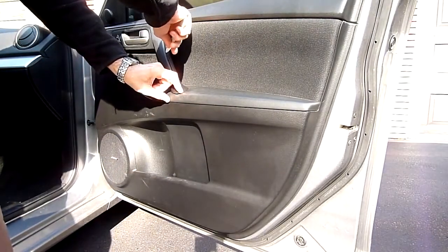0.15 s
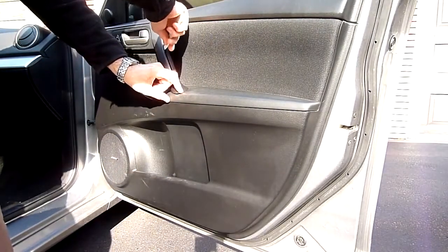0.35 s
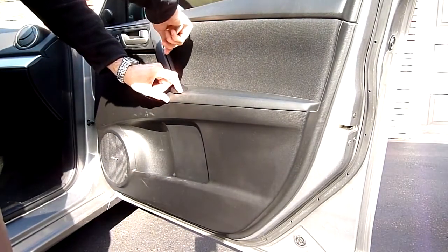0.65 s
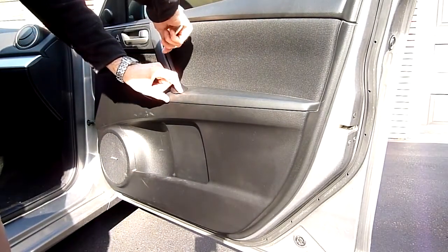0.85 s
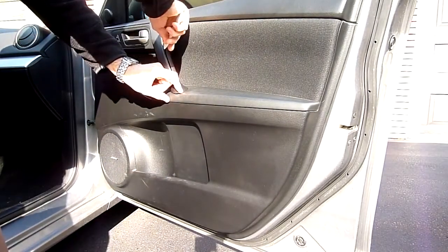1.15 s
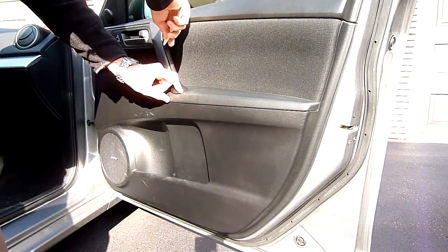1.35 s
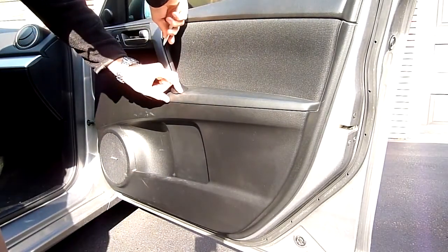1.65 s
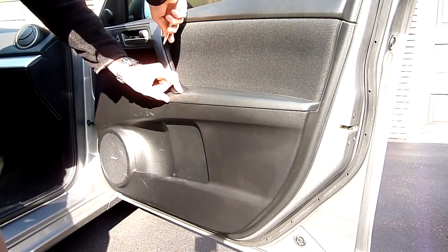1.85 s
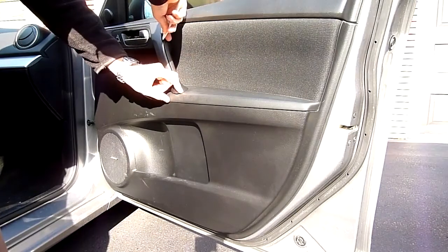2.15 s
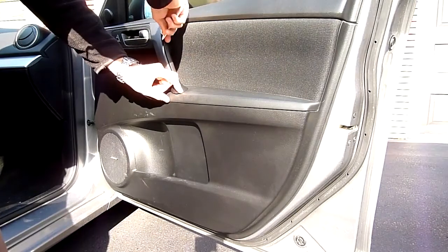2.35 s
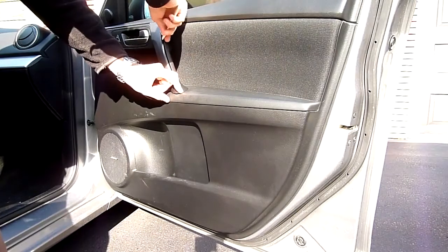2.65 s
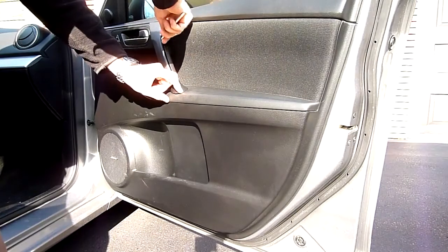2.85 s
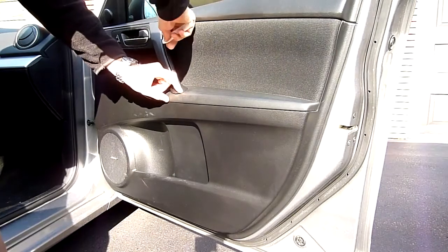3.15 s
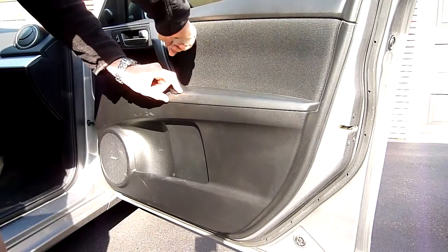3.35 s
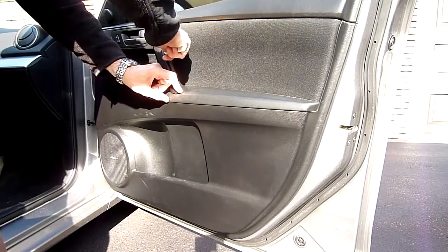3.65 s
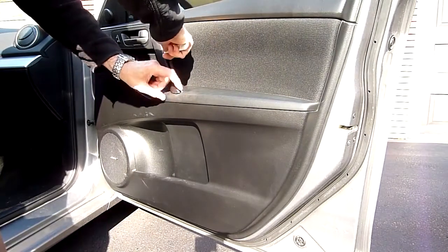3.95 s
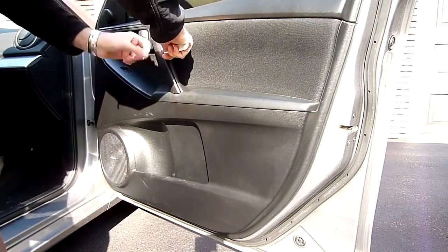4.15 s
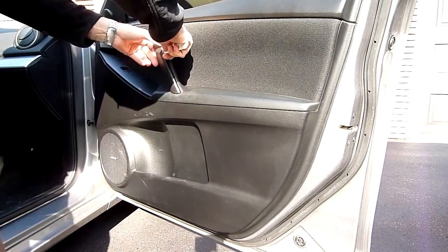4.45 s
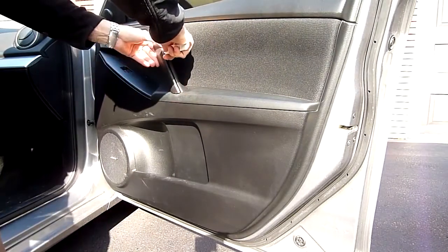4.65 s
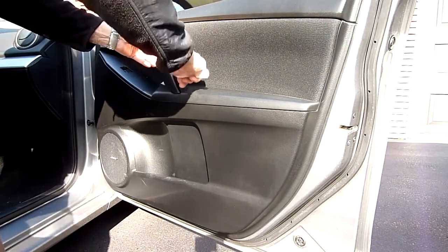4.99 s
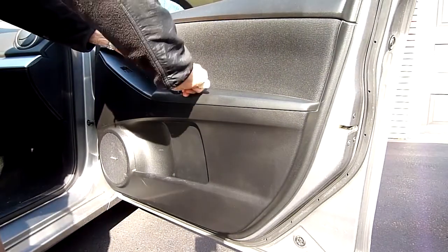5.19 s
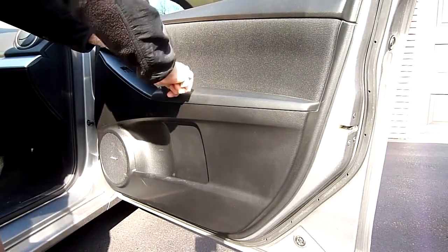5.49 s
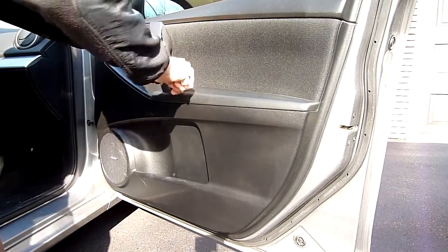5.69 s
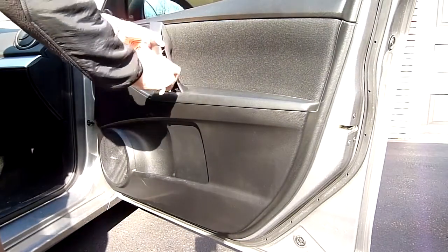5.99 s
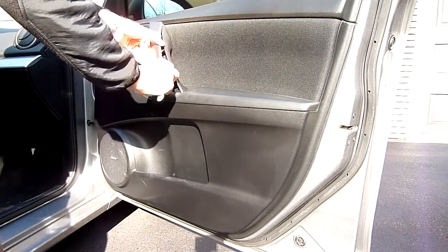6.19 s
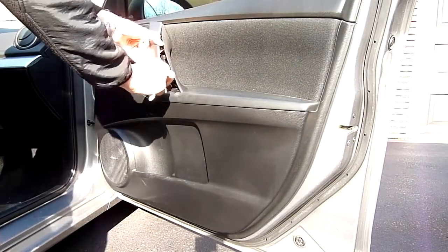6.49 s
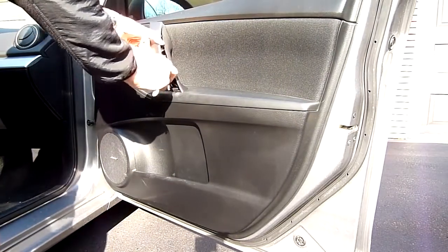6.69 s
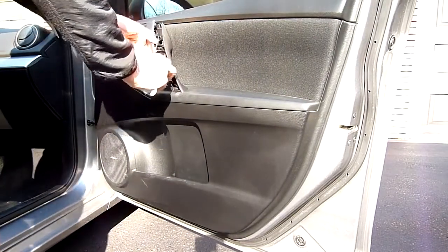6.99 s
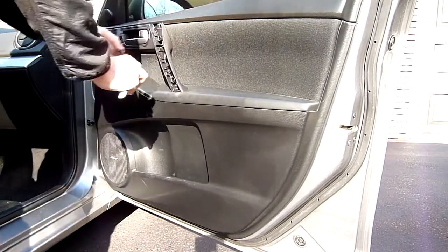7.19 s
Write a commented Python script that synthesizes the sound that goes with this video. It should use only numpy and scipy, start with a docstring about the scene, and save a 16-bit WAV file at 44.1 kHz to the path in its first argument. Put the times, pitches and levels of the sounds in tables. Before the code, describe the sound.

A tool ticks, knocks and scrapes against a plastic car door panel, then the trim cover pops off with loud snaps.

```python
"""Ticks, scrapes and hollow knocks, then loud snaps: a plastic trim cover is levered off an open car door.
The pry tool sticks, squeaks and slips in the seam until the clips let go. Each contact rings the
panel's modes, its plastic and the cabin behind it, heard as a thump, a knock and a crack.
A jacket sleeve rustles now and then over a steady outdoor rush; a faint whine joins late."""
import sys
import numpy as np
from scipy import signal
from scipy.fft import irfft
from scipy.io import wavfile

SR = 44100
rng = np.random.default_rng(int(sys.argv[2]) if len(sys.argv) > 2 else 0)


def unload_wav(signal):
    """Save mono or channel-first audio to the path in sys.argv[1] as 16-bit WAV at rate SR, clipped to [-1, 1]."""
    wavfile.write(
        sys.argv[1],
        SR,
        np.round(np.clip(np.atleast_2d(signal).T, -1, 1) * 32767).astype(np.int16),
    )


N = 323253
RING_SIZE = 12000   # samples of ring after a contact
AGE = np.arange(RING_SIZE) / SR
EDGES = np.geomspace(22, 18000, 21)   # half-octave bands [Hz]
CENTRES = np.sqrt(EDGES[1:] * EDGES[:-1])
LEFT_RIGHT = np.array([[1], [-1]])
THUMP_HZ, KNOCK_HZ, CRACK_HZ, GRIT_HZ = 326, 918, 3350, 4537   # panel, cover, edge, plastic grain


def snaps(spots, punch_db=4.0, punch_s=0.0048):
    """The clips spring free; the hand damps the cover, so the first instant stands out."""
    # clips letting go: (time [s], thump [dB], thump [Hz], knock [dB], knock [Hz], crack [dB],
    # crack [Hz], crack span [frequency ratio each way])
    releases = [(5.4058, 31, 377, 28, 1020, 2, 6400, 3.6), (5.479, 28, 270, 15, 1260, 1.5, 4900, 1.7),
                (5.4841, 2, 260.2, 22.5, 606, 15.5, 3340, 1.17),
                (6.763, -5, 277, 19.5, 1210, 12, 6000, 1.22),
                (6.7672, 29.5, 420, 26.5, 1700, 16.5, 5670, 1.41)]
    out = np.zeros((2, N))
    grip = 1 + (from_db(punch_db) - 1) * np.exp(-(AGE / punch_s) ** 2)
    for (s, *colour, span), spot in zip(releases, spots):
        add(out, s, contact(spot * grip, *colour, spans=(1.48, 1.496, span), flex_db=-9, fizz_db=-17))
    return out


def pries(spots, groan_hz=383):
    """The tool drags and squeaks along the seam under rising force, then slips and hits the panel."""
    # (slip time [s], drag length [s], groan [dB], grit [dB], squeak [Hz], thump [dB], knock [dB])
    strokes = [(0.27, .033, -16.5, -37, 3160, 15.5, -2), (3.422, 0.017967, -19.5, -23.5, 9350, 5, 20.5),
               (3.438, .014, -13.5, -22, 5800, 23, 19), (4.9, 0.022, -27, -30.5, 9930, 19.5, -8),
               (4.9365, 0.029, -25, -32.5, 5700, 13.5, 22), (5.031, 0.018, -28, -31, 9800, 15, 19),
               (5.089, .027, -35, -30, 4540, 17, 18)]
    out = np.zeros((2, N))
    for (s, length, groan_db, grit_db, squeak_hz, thump_db, knock_db), spot in zip(strokes, spots):
        grit_hz = GRIT_HZ * (squeak_hz / GRIT_HZ) ** 0.49   # the grit brightens with the squeak
        colour = groan_db, groan_hz, groan_db - 3, KNOCK_HZ, grit_db, grit_hz
        add(out, s - length, scrape(spot, length, *colour, slips_per_s=1200))
        add(out, s - length, squeak(length, squeak_hz, grit_db - 10, roughness=0.24))
        add(out, s, contact(spot, thump_db, THUMP_HZ, knock_db, knock_hz=642,
                            crack_db=-7, crack_hz=CRACK_HZ, flex_db=-10))
    return out


def taps(spots, faint_per_s=1.5, spread_db=2.5):
    """The tool ticks and knocks on the panel; never quite still, it adds faint ticks at random."""
    # (time [s], thump [dB], knock [dB], knock [Hz], crack [dB])
    hits = [(0.079, 6, -2, 520, -37), (0.229, 7, 4, 784, -16), (0.246, 15, 9, 760, -10.5),
            (0.302, 1, -1, 704.8, -17), (0.482, 3, 7, 865, -30), (0.874, -14, 3, 704, -18),
            (0.998, -9, 1.5, 800, -32), (1.216, -4, 1, 780, -16), (1.235, 10.5, 17.5, 870, -28.5),
            (1.282, 2, 10.5, 546, -18), (1.85, -5, 0, 980, -21), (1.968, 5, 5, 1040, -24),
            (2.0, 4, 14, 470, -14), (2.082, -4, 1.5, 785, -29), (2.117, 4.5, -19, 550, -34),
            (2.193, 5, -12, 800, -25), (2.367, -4, 8, 845, -21), (2.408, 2, 5, 810, -35),
            (2.658, -8, -8, 1118, -26), (2.715, 2, 7, 457, -13), (2.84, -3, 8, 810, -23.5),
            (3.241, 0, -5, 960, -38.5), (3.408, 8.5, -1, 950, -9), (3.511, 12.5, 7, 440, -22),
            (3.6507, 4.5, 7, 920, -21), (3.999, 0, 0.5, 715.5, -13), (4.411, -13, -5, 1320, -24),
            (4.461, 2, 5, 540, -35), (4.7267, 5, 2, 853.1, -11.5), (4.768, 8, 10.5, 750, -11),
            (5.282, -3, 4, 991.4, -13), (5.576, 4, -11, 1600, -20.5), (5.607, 1, -27, 1600, -10),
            (6.912, 6.5, -11, 1600, -22)]
    out, chance = np.zeros((2, N)), rng.random((40, 2))
    times = np.cumsum(-np.log(1 - chance[:, 0])) / faint_per_s
    accents_db = spread_db * (2 * chance[:, 1] - 1)
    faint = [(s, db - 8, db - 4.5, KNOCK_HZ, db - 28) for s, db in zip(times, accents_db) if s < N / SR]
    for (s, thump_db, knock_db, knock_hz, crack_db), spot in zip(hits + faint, spots):
        add(out, s, contact(spot, thump_db, THUMP_HZ, knock_db, knock_hz, crack_db, CRACK_HZ))
    return out


def rubs(spots, cover_hz=1188):
    """Dull, short scrapes: the loosened cover sliding on the door, the panel juddering just after a slip, and
    soft, slow knocks."""
    # (time [s], length [s], body [dB], body [Hz], hiss [dB])
    shifts = [(0.825, 0.069, -29.5, 517, -55), (1.286, 0.014, -22, 450, -48),
              (1.991, 0.052, -26, 424.2, -43), (2.705, 0.015, -19, 410, -61), (3.116, 0.043, -20, 515, -41),
              (3.505, 0.049, -26, 430, -57), (4.769, 0.11, -24.5, 337, -58.5),
              (4.951, 0.067, -26, 620, -45.5), (5.1, .06, -22.5, 534.8, -42),
              (5.205, 0.11937, -23.5, 313, -50), (5.404, 0.0056, -10, 600, -24),
              (5.477, .012, -3, 290, -22), (5.746, .05, -22.5, 314.3, -56), (6.11, .06, -27.5, 380, -54),
              (6.608, 0.02, -12.5, 281, -52.5)]
    out = np.zeros((2, N))
    for (s, length, body_db, body_hz, hiss_db), spot in zip(shifts, spots):
        add(out, s, scrape(spot, length, body_db, body_hz, body_db - 26, cover_hz, hiss_db, GRIT_HZ))
    return out


def squeaks():
    """Thin squeaks as the tool feels along the seam under light pressure."""
    # (time [s], length [s], pitch [Hz], level [dB])
    slides = [(0.824, 0.13, 3640, -56), (1.208, 0.02512, 5000, -51), (1.259, 0.036, 2980, -56.5),
              (1.28, .16, 5100, -62), (1.35, .1, 3100, -59), (4.76, 0.21, 5977, -55)]
    out = np.zeros((2, N))
    for s, length, hz, level_db in slides:
        add(out, s, squeak(length, hz, level_db, roughness=0.055))
    return out


def door_responses(count, click_db=-6, bending_db=-7, plastic_db=-0.5, modes_db=1, spread_db=1.5):
    """The door's answer to a tap at count spots: click, bending wave, modes, dense ring and cabin."""
    # modes of the panel and its cover: (frequency [Hz], relative level [dB], t60 [s])
    panel_modes = [(163, -21, 0.17), (234, 2.5, 0.12), (270, 5, 0.25), (340, -28.5, 0.16),
                   (406.3, 0, 0.067), (487, 5.5, 0.068), (555, 5, 0.31), (662.4, 4, 0.10056),
                   (930.52, 5.5, 0.044), (989.92, 6, 0.063), (1418, 5, 0.03), (1600, -3, 0.0592),
                   (1980, 6.5, 0.019), (2285, -27, 0.088), (3180, -10.5, 0.015), (3580, -9, 0.0562),
                   (3930, -29, 0.069), (4840, -10, 0.054), (5376.9, -5, 0.016), (5490, 2, 0.036),
                   (5900, 3.5, 0.025), (6680, -2, 0.04), (7460, -16, 0.039), (9800, 7, .025),
                   (10460, 8, 0.04)]
    # dense ring: (frequency [Hz], plastic t60 [s], cabin t60 [s], cabin level [dB])
    tails = [(152, 0.15, 0.6, -1), (430, 0.18, 0.41, -13), (1010.3, 0.056, 0.21, -10.5),
             (2476, 0.015, 0.061, 1.5), (6000, 0.028, 0.1, -9.5), (14000, 0.0064, 0.0747, -12)]
    hz, level_db, t60 = np.transpose(panel_modes)
    damping = np.log(1000) / (t60[:, None] * SR)
    modes = 2 * damping * np.exp(-damping * AGE * SR) * np.cos(2 * np.pi * hz[:, None] * AGE)
    plastic = from_db(plastic_db) * decays(at_hz(tails, CENTRES))
    cabin = from_db(at_hz(tails, CENTRES, column=3))[:, None] * decays(at_hz(tails, CENTRES, column=2))
    decay = np.hypot(plastic, cabin)
    # stereo width of the ring: (frequency [Hz], side against mid [dB])
    side_levels = [(200, -31.5), (600, -20), (1400, -12), (5000, -14), (13000, -10)]
    width = from_db(at_hz(side_levels, CENTRES))
    noise = noise_bands()
    attack = from_db(click_db) * (AGE == 0) + from_db(bending_db) * bending_wave()
    for start in rng.integers(0, N - RING_SIZE, count):
        mid, side = (noise[:, :, start:start + RING_SIZE] * decay[:, None]).transpose(1, 0, 2)
        # every spot drives the modes with strengths of its own
        ringing = from_db(modes_db + level_db - spread_db * rng.standard_normal(len(hz))) @ modes
        yield attack + ringing + mid.sum(0) + 2 * (width @ side) * LEFT_RIGHT


def bending_wave(travel_s=0.003098, damping_hz=1400):
    """Low bending waves cross the panel more slowly, so a tap falls in pitch; travel_s is at 1 kHz."""
    hz = np.arange(RING_SIZE // 2 + 1) * SR / RING_SIZE
    phase = 4 * np.pi * travel_s * np.sqrt(1000 * hz)
    return irfft(np.exp(-1j * phase) / (1 + 1j * hz / damping_hz) ** 2, RING_SIZE)


def contact(shake, thump_db, thump_hz, knock_db, knock_hz, crack_db, crack_hz,
            spans=(1.52, 1.391, 1.944), flex_db=-14, fizz_db=-23.5, energy=1.0):
    """The panel thumps, the cover knocks and the edge cracks, each higher for a stiffer contact."""
    thump_span, knock_span, crack_span = spans   # frequency ratios each way
    layers = [(thump_db + flex_db, 130, 1.4),   # the whole door flexes under the thump
              (thump_db, thump_hz, thump_span),
              (knock_db, knock_hz, knock_span),
              (crack_db, crack_hz, crack_span),
              (crack_db + fizz_db + 20 * np.log10(crack_hz / 5000), 13000, 1.3)]   # the crack's top fizz
    out = 0
    for k, (level_db, hz, span) in enumerate(layers):
        low, high = hz / span, hz * span
        layer = band(shake, low, high)
        share = energy * 2 * (high - low) / SR   # the band's share of the energy
        out = out + (-1) ** k * from_db(level_db) * layer * np.sqrt(2 * share / np.sum(layer ** 2))
    return out


def scrape(response, length, *colour, slips_per_s=1800, spread_db=4.0, build=0.2):
    """Stick and slip over grained plastic: a dense run of tiny uneven taps that builds with the force."""
    size = int(length * SR)
    slipping = rng.random(RING_SIZE) < slips_per_s / SR
    strength = from_db(spread_db * np.minimum(rng.exponential(1, RING_SIZE), 4))
    slips = slipping * strength * rng.choice([-1, 1], RING_SIZE)
    slips[0] = 1   # every slide starts with a slip
    force = slips[:size] * np.linspace(.1, 1, size) ** build
    shake = signal.fftconvolve(force[None], response, axes=1)
    return contact(shake, *colour, fizz_db=-32, energy=size)


def squeak(length, hz, level_db, roughness, sag=0.02016):
    """Under steady pressure the slips fall into a rough, sagging pitch; both are shares of hz."""
    return chirp(length, hz, hz * (1 - sag), level_db, width_hz=roughness * hz)


def chirp(length, first_hz, last_hz, level_db, width_hz):
    """Nearly regular slips: a gliding tone whose strength and phase wander."""
    size = int(length * SR)
    smoothing = signal.butter(2, width_hz / 2, fs=SR, output="sos")
    wander = signal.sosfilt(smoothing, rng.standard_normal((2, RING_SIZE)))[:, -size:]
    phase = 2 * np.pi * np.cumsum(np.linspace(first_hz, last_hz, size)) / SR
    tone = unit_power(wander[0] * np.cos(phase) + wander[1] * np.sin(phase))
    return from_db(level_db) * tone[None] * signal.windows.tukey(size, .5)


def sleeve(rest_db=-74, grain_db=3.0):
    """Jacket cloth slides on itself: a fine, grainy hiss with each arm movement, and one thin zip."""
    # arm movements: (start [s], rise [s], length [s], fade [s], level [dB])
    arm_moves = [(0, .01, .02, .08, -56), (0.82, .04, 0.22, 0.5, -53.5), (3.44, .06, 0.0684, .08, -57),
                 (4.71, 0.1269, 0.39, 0.0708, -51.5), (5.96, .03, 0.34, .07, -52),
                 (6.296, .15, 0.21, .5, -55), (7.018, 0.22, .3, .1, -50)]
    # cloth hiss: (frequency [Hz], relative density [dB])
    cloth_spectrum = [(500, -5), (1500, -1), (3500, 1), (7000, 0), (11000, -2), (15000, -4)]
    motion = from_db(rest_db)
    for *timing, level_db in arm_moves:
        motion = np.maximum(motion, from_db(level_db) * swell(*timing))
    hiss = rush(cloth_spectrum, flicker_db=-1.5, flicker_per_s=50)
    out = hiss * motion * from_db(grain_db * drift(per_s=31))
    # ribbed cloth zips faster as the arm pulls away
    add(out, 7.085, chirp(length=.135, first_hz=13900, last_hz=15800, level_db=-60, width_hz=600))
    return out


def outdoor_air(level_db=-44.5):
    """A steady, low outdoor rush that wavers slightly."""
    # (frequency [Hz], relative density [dB])
    air_spectrum = [(25, -25.5), (45, -5), (100, -3.5), (160, -6.5), (240, -1.5), (400, -6), (620, -4.5),
                    (880, -4.5), (1300, -8), (2110, -13.5), (3520, -18), (8000, -26.5), (16000, -34)]
    return from_db(level_db) * rush(air_spectrum, flicker_db=1.0, flicker_per_s=12)


def whine(hz=2045, start_s=5.7, rise_s=.1, onset_db=-61, rest_db=-68):
    """A thin wavering tone far off, strongest as it sets in, then staying on faintly."""
    onset = from_db(onset_db) * swell(start_s, rise_s, length=0.3, fade=rise_s)
    rest = from_db(rest_db) * curve([(start_s, 0), (start_s + rise_s, 1)])
    tone = unit_power(band(rng.standard_normal(N), hz - 9, hz + 9))
    return np.maximum(onset, rest) * tone


def rush(spectrum, flicker_db, flicker_per_s):
    """Stereo noise of unit power whose bands each waver on their own."""
    # centred lows, wide highs: (frequency [Hz], left-right likeness [0-1])
    likeness = [(40, 0.98), (200, 0.9), (700, 0.75), (1500, 0.4648), (4000, 0.07667), (14000, 0.1622)]
    out = 0
    for hz, (mid, side) in zip(CENTRES, noise_bands()):
        alike = at_hz(likeness, hz)
        gain = from_db(at_hz(spectrum, hz) + flicker_db * drift(flicker_per_s))
        out = out + gain * (np.sqrt(1 + alike) * mid + np.sqrt(1 - alike) * side * LEFT_RIGHT)
    return unit_power(out)


def noise_bands():
    """Half-octave bands of mid and side noise."""
    white = rng.standard_normal((2, 2, N))
    return np.array([band(white[k % 2], *edges) for k, edges in enumerate(zip(EDGES, EDGES[1:]))])


def drift(per_s):
    """A random wander, spread about 1, with per_s turns a second."""
    knots = rng.standard_normal(1000)
    return np.interp(np.arange(N) / SR * per_s, np.arange(len(knots)), knots)


def decays(t60):
    """Exponential decays of unit energy, one for each t60."""
    fall = np.exp(-np.log(1000) * AGE / t60[:, None])
    return fall / np.linalg.norm(fall, axis=1, keepdims=True)


def swell(start, rise, length, fade):
    """An envelope that rises, holds until its length is over, then fades."""
    return curve([(start, 0), (start + rise, 1), (start + length, 1), (start + length + fade, 0)])


def curve(points):
    """An envelope through (time [s], value) points."""
    return np.interp(np.arange(N) / SR, *np.transpose(points))


def at_hz(rows, hz, column=1):
    """One column of a table, read on a log-frequency axis."""
    rows = np.array(rows)
    return np.interp(np.log(hz), np.log(rows[:, 0]), rows[:, column])


def band(x, low_hz, high_hz, order=2):
    """Causal band-pass."""
    sos = signal.butter(order, [low_hz, min(high_hz, .45 * SR)], "band", fs=SR, output="sos")
    return signal.sosfilt(sos, x + 1e-18)


def from_db(db):
    """Decibels to gain."""
    return 10 ** (np.asarray(db) / 20)


def unit_power(x):
    """Scale to an RMS of 1."""
    return x / np.sqrt(np.mean(x ** 2) + 1e-20)


def add(out, s, sound):
    """Mix a sound in at time s."""
    start = int(s * SR)
    out[:, start:start + sound.shape[1]] += sound[:, :N - start]


def scene(treble_lean=0.12):
    """Each event falls on a new spot of the door; the work sits a little left, heard in the treble."""
    spots = iter(list(door_responses(count=78)))
    door = snaps(spots) + pries(spots) + rubs(spots) + taps(spots) + squeaks()
    door = door + treble_lean * LEFT_RIGHT * band(door, 2500, 18000, order=1)
    return door + outdoor_air() + sleeve() + whine()


def record(dry, cutoff_hz=15900):
    """The loudest snaps are rounded off at full scale; a steep low-pass cuts the top."""
    rounded = dry / (1 + dry ** 4) ** (1 / 4)
    return signal.sosfilt(signal.ellip(10, .2, 70, cutoff_hz, fs=SR, output="sos"), rounded)


dry = scene()
out = record(dry)
unload_wav(out)
```